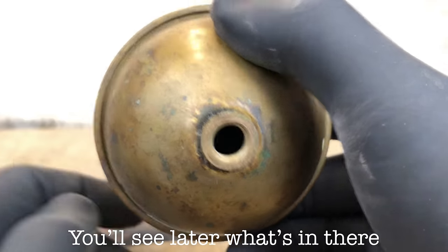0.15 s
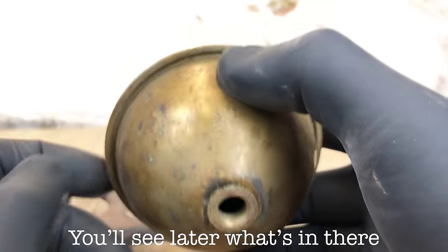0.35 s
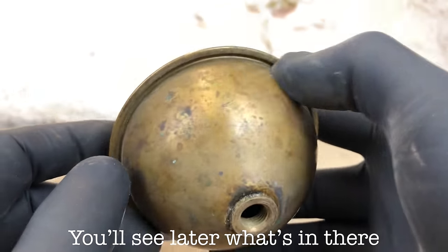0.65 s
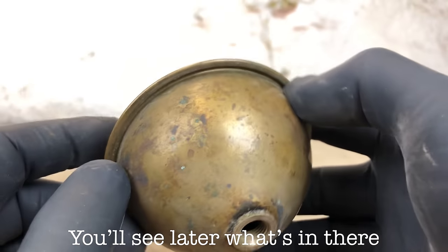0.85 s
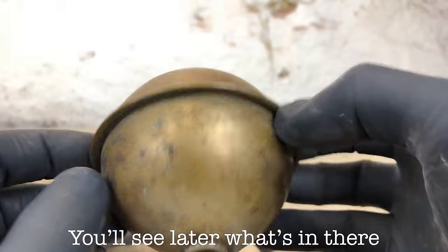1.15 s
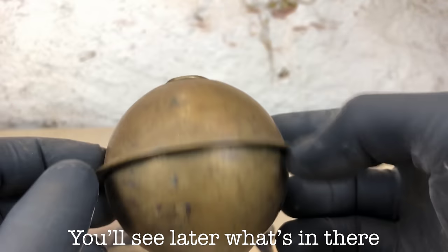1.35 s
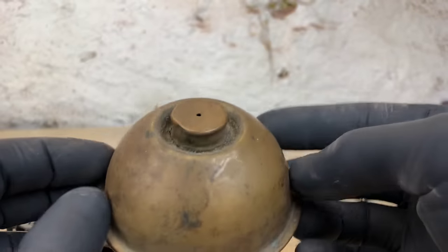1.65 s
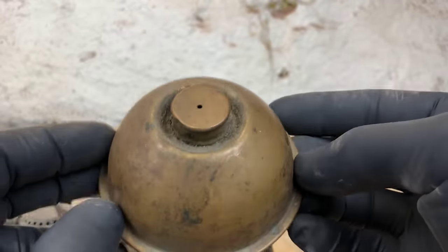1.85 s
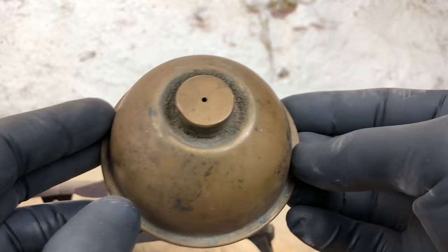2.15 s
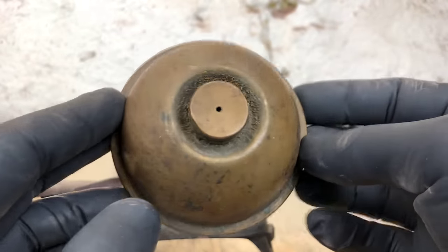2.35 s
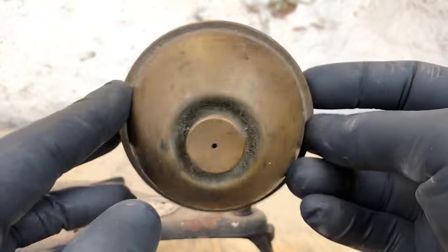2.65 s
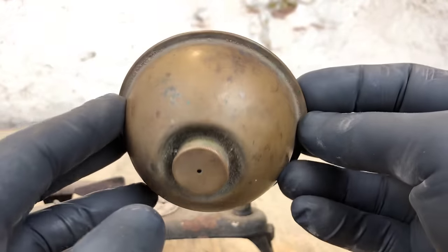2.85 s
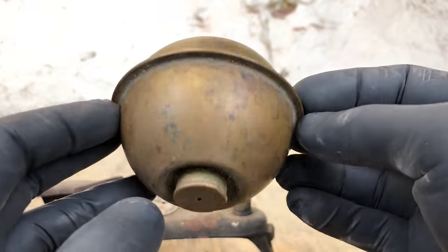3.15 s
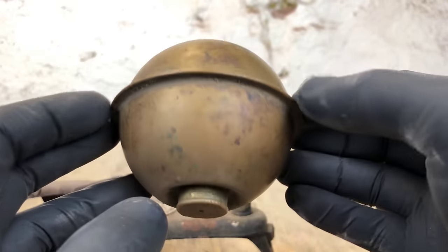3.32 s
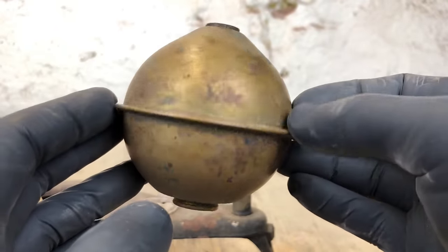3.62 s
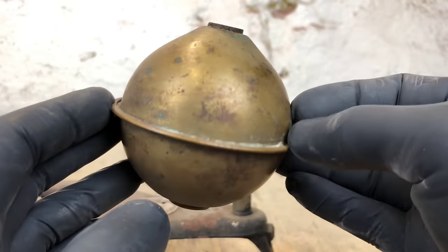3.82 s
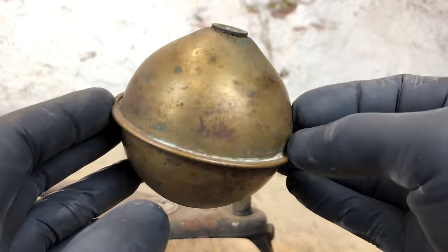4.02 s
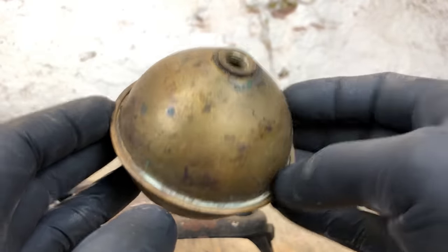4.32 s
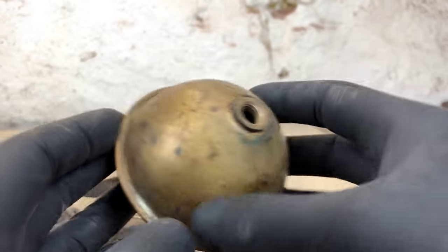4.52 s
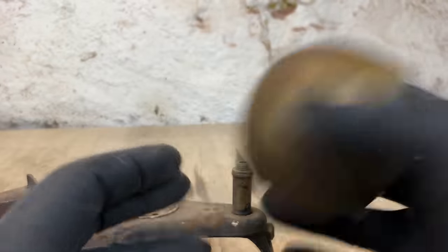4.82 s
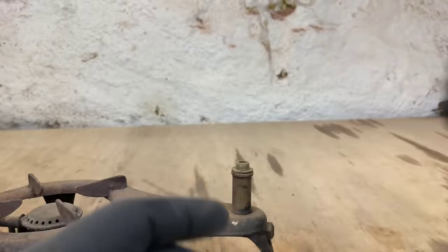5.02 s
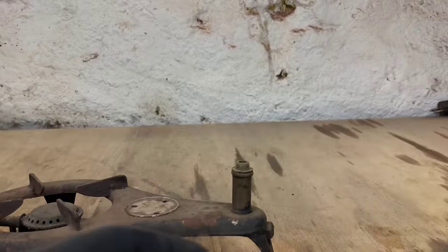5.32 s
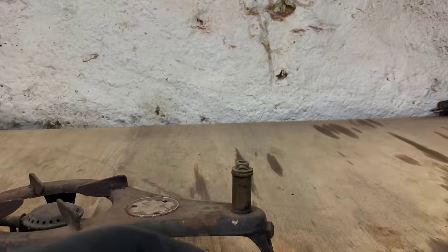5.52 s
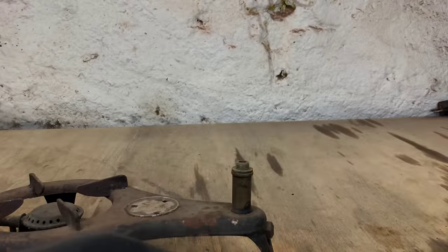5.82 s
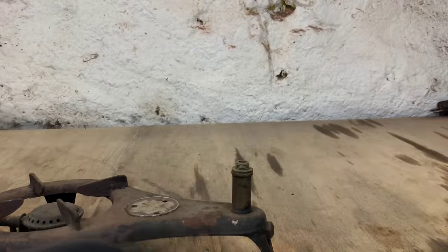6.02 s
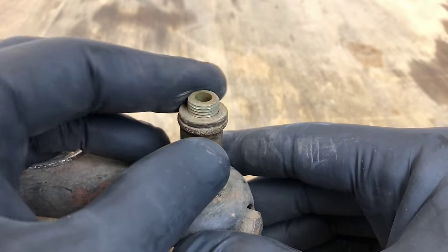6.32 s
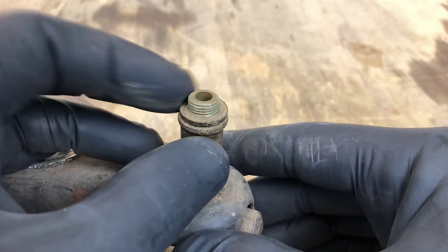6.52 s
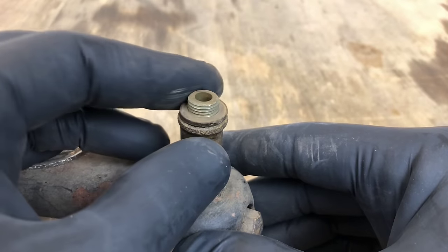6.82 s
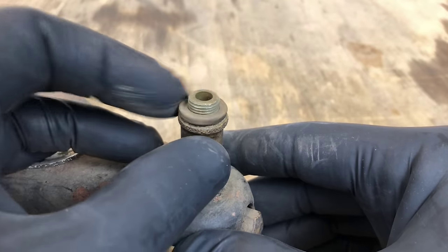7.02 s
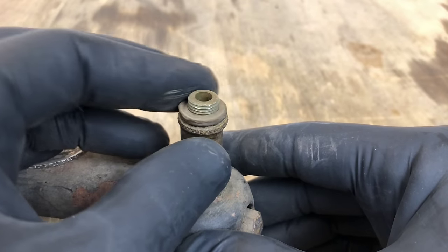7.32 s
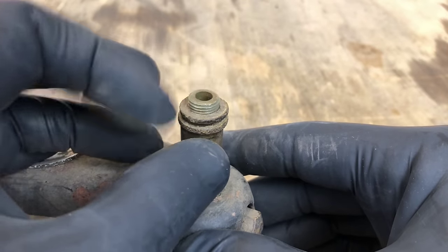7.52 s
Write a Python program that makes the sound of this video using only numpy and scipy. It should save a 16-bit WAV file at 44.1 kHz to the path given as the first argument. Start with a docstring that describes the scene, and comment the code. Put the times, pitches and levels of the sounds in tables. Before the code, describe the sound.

Close up in a small workshop, rubber gloves hiss faintly over a hollow brass ball, with tiny crisp ticks. A loose piece clatters brightly inside it, then a glove snaps off the metal and more ticks follow. An old iron stove lands with one loud, hard knock on a wooden bench. Finally a finger turns a threaded fitting in three short strokes, softly grinding and shrilly squeaking.

```python
"""Brass ball and stove fitting

Gloved hands turn a hollow brass ball: coloured noise makes the rubber hiss, decaying tones a rattle inside.
An old iron stove knocks once on the bench: a burst of noise, ringing tones and a low boom.
A finger then turns its threaded fitting in three strokes: noise through resonances makes each soft grinding,
and bending tones with overtones make the shrill squeaks. Close sound, small workshop with short echoes."""
import sys
import numpy as np
from scipy import signal
from scipy.fft import rfft, irfft, next_fast_len
from scipy.io import wavfile

SR = 44100
rng = np.random.default_rng(int(sys.argv[2]) if len(sys.argv) > 2 else 0)


def generate_wav(sig):
    """Save sig (samples, or channels by samples) to the path in sys.argv[1] as 16-bit PCM at SR."""
    pcm = np.round(np.clip(np.atleast_2d(sig).T, -1, 1) * 32767).astype(np.int16)
    wavfile.write(sys.argv[1], SR, pcm)


N = 338247
TIME = np.arange(N) / SR   # seconds

# Levels are relative: each sound may also have a trim of its own in its function.
# slides of the glove over the ball: [start t/s, length t/s, friction level/dB, fine hiss level/dB,
# swell from start to end level/dB]
GLOVE_SLIDES = [(0.052, 0.39, -69, -64.5, 5.5), (0.519, 0.064, -61.5, -55.5, 4),
                (0.62, 0.039, -60, -52.5, 4), (0.706, 0.55, -64.5, -57, 2.5), (1.315, 0.086, -69.5, -70, 8),
                (1.397, 0.13, -64.5, -58.5, 7), (1.597, .025, -58.5, -63, 0),
                (1.658, 0.39, -72.5, -65.5, -10.5), (2.03, .33, -79, -79, 7),
                (2.405, 0.057, -66.5, -66, -1), (2.506, .2, -68, -67.5, -1.5),
                (2.793, 0.43, -70.5, -69, 2.5), (3.24, 0.58, -68, -65.5, -3.5),
                (3.96, 0.034, -70.5, -72, -1), (4.118, 0.16, -67.5, -61, 1.5),
                (4.32, 0.362, -64.5, -55.5, 9), (4.729, 0.028, -59, -54, 3), (4.876, 0.17, -61.5, -62, 0),
                (5.072, 0.24, -76, -72, -5), (5.46, 0.079, -82, -76, 7)]
# colour of the rubbing: [f/Hz, level/dB per Hz]
FRICTION_COLOUR = [(700, -9.5), (1400, -10.5), (2200, -4), (3400, -3), (5500, 2), (8000, -0.5), (11000, -7),
                   (16000, -17.5)]
# colour of the finest hiss: [f/Hz, level/dB per Hz]
FINE_HISS_COLOUR = [(5000, -52), (9000, -13), (11500, -9.5), (13000, -8.5), (15000, 0), (16000, -4)]
# shell damped by the fingers: [f/Hz, width f/Hz, level/dB]
HELD_SHELL_RESONANCES = [(2810, 78, 0), (2845, 113, 4.5), (3960, 110, -5.5), (4155, 85, 1.5),
                         (4513, 85, 1.5), (5230, 120, -2), (5950, 150, -1.5), (6870, 73, -1.5),
                         (7720, 52, 0.5), (9200, 25, 1), (8860, 79, 0.5), (10000, 70, -0.5), (10600, 54, 3),
                         (12200, 110, 4), (13050, 120, 3.5)]
# soft bumps of the handling: [t/s, length t/s, level/dB, pitch f/Hz]
HANDLING_BUMPS = [(0.19, 0.21, -67, 220), (0.364, 0.22, -71, 403), (0.816, 0.28, -75.5, 398),
                  (1.025, 0.067, -65.5, 213), (1.622, 0.058, -59, 314), (1.683, 0.031, -67, 290),
                  (1.947, 0.083, -74, 404), (2.456, 0.057, -69, 290), (2.92, 0.15, -69.5, 230),
                  (3.326, 0.064, -68.5, 261), (3.692, 0.022, -72, 280), (4.298, 0.08, -69, 260),
                  (5.557, 0.063, -62.5, 212), (5.687, 0.029, -73.5, 180)]
# dull colour of the bumps: [f/Hz, level/dB per Hz]
BUMP_COLOUR = [(110, -16.5), (170, 1), (230, -3.5), (320, -1), (450, -5), (700, -16.5), (1500, -26.5)]
# small crisp ticks of bits inside the ball: [t/s, level/dB]
BALL_TICKS = [(1.1036, -42), (1.277, -38), (1.3099, -48), (1.5733, -45), (1.597, -43), (2.1306, -58),
              (2.2164, -57), (2.7821, -56), (4.848, -37), (4.9453, -45), (4.98, -44), (5.006, -42.5),
              (5.033, -40), (5.0726, -41), (5.119, -44), (5.1407, -44), (5.3687, -54)]
# colour of the ticks: [f/Hz, level/dB per Hz]
TICK_NOISE_COLOUR = [(1500, -21), (6000, -22), (10000, -19), (13000, -2), (15300, 11)]
# rubber letting go of metal: [t/s, level/dB]
RUBBER_SNAPS = [(0.661, -47), (0.862, -50), (2.47, -53), (4.2942, -26.5), (6.184, -58), (6.536, -45.5),
                (7.007, -46.5), (7.445, -47.5), (7.477, -49)]
# ring of the rubber's snap: [f/Hz, level/dB, time to fade by 60 dB t/s]
SNAP_RING = [(2400, 0, 0.0028), (4200, -7, .002), (7000, -2, 0.004), (8900, -3, .003), (13800, 0.5, .001)]
# noise of the snap, also of the stove's chink: [f/Hz, level/dB per Hz]
SNAP_NOISE_COLOUR = [(400, -23.5), (1200, -17), (2500, 2), (4000, -1.5), (7000, -4), (11000, -7.5),
                     (16000, -22)]
# loose piece striking inside the ball: [t/s, level/dB, extra for the low shell tones level/dB]
RATTLE_BLOWS = [(2.802, -18.5, -12), (2.826, -24, -20), (3.273, -8, -15.5), (3.295, -14, -26),
                (3.3012, -6, -5), (3.3051, 1.5, 4), (3.32, 3.5, -12), (3.3452, -7.5, -18),
                (3.377, -8.5, -23), (3.402, -16, -37), (3.428, -12, -39), (3.443, -21, -27)]
# ringing tones of the brass shell: [f/Hz, level/dB, time to fade by 60 dB t/s]
SHELL_RING = [(2820, -67, 0.067), (2900, -35, 0.1), (3000, -50, 0.061), (3062, -52, 0.13),
              (3891, -43, 0.11), (4340, -60, 0.045), (7580, -48.5, 0.049), (8600, -45, 0.035),
              (9140, -56, 0.042), (9469, -55, 0.088), (10450, -59, 0.062), (11500, -42, 0.053),
              (11900, -54, 0.059), (12660, -46, 0.065), (13220, -46, 0.081), (13400, -47, 0.1),
              (14190, -48, .07), (15300, -47, .05)]
# bright noise of a blow on the shell: [f/Hz, level/dB per Hz]
SHELL_CRACK_COLOUR = [(5500, -30), (7200, -9.5), (8000, -4), (10000, 14), (12000, 4), (16000, 11.5)]
# lower noise of a blow on the shell: [f/Hz, level/dB per Hz]
SHELL_CLACK_COLOUR = [(400, -34), (1500, -28), (2400, -19), (3000, 7), (3500, -3), (4000, 4), (5200, -32),
                      (9000, -29)]
# stove foot landing on the bench: [t/s, level/dB, metal chink level/dB]
STOVE_KNOCKS = [(5.7944, -0.5, -53.5), (5.8, -14.5, -40)]
# stove frame on the bench: [f/Hz, level/dB, time to fade by 60 dB t/s]
STOVE_RING = [(185, -42, 0.25), (256, -45, 0.25), (300.7, -35, 0.32), (365.6, -42, .18), (442, -40, 0.17),
              (520, -38, .12), (575, -32, 0.19), (627.5, -37, 0.19), (657, -32, 0.14), (732, -30, 0.14),
              (803, -33.5, 0.079), (851, -27, 0.15), (906, -31, 0.12), (1223, -32, 0.083),
              (1440, -42, 0.12), (2760, -41.5, 0.089), (3070, -44.5, 0.076), (3050, -47.5, .08),
              (3390, -42.5, 0.087)]
# further tones of the knock, most of them very short: [f/Hz, level/dB, time to fade by 60 dB t/s]
KNOCK_RING = [(604, -14.5, 0.021), (843, -25, 0.12), (1125, -23.5, 0.0067), (3240, -19.5, 0.0134),
              (4730, -30.5, 0.017)]
# noise of the landing: [f/Hz, level/dB per Hz]
THUD_COLOUR = [(110, -6.5), (240, 3.5), (470, -6), (690, 5.5), (930, -5), (1400, -10), (1900, -19),
               (2450, -25), (2750, -14), (3250, -8), (4000, -30.5), (4650, -22.5), (5500, -21.5),
               (6200, -35), (12000, -46)]
# pushes of the finger on the fitting: [start t/s, length t/s, thread grinding level/dB, glove drag level/dB]
FITTING_PUSHES = [(6.27, .05, -63.5, -69), (6.371, 0.049, -62.5, -62.5), (6.483, 0.065, -67, -69),
                  (6.767, 0.044, -67.5, -65), (6.877, 0.051, -65, -63), (7.012, 0.027, -65.5, -64.5),
                  (7.246, .05, -68.5, -63.5), (7.346, 0.047, -64.5, -64), (7.45, 0.022, -59, -60)]
# stove body under the grinding thread: [f/Hz, width f/Hz, level/dB]
GRIND_RESONANCES = [(159, 13, 1.5), (312, 124, -7.5), (612, 27, -2.5), (689.4, 27, 1), (882, 49, -4.5),
                    (1004, 36, -10.5), (1253, 140, -16.5), (1648, 50, -11.5), (2120, 450, -25),
                    (4900, 260, -23), (6400, 200, -19.5), (10100, 95, -28)]
# smooth hiss of the glove on the fitting: [f/Hz, level/dB per Hz]
GLOVE_DRAG_COLOUR = [(1500, -25), (3000, -7), (5000, -5.5), (8500, -8), (11000, -2.5), (13500, 4),
                     (16000, -4.5)]
# the hand leans on the stove: [t/s, length t/s, level/dB]
HAND_LEANS = [(6.735, 0.093, -59), (7.28, 0.079, -59.5), (7.46, 0.0694, -51.5)]
# low rumble, steady and in the leans: [f/Hz, level/dB per Hz]
RUMBLE_COLOUR = [(35, -34), (58, -10.5), (71, 5.5), (90, -10), (130, -15), (250, -21.5), (500, -46)]
# finger sliding back for a new stroke: [t/s, length t/s, level/dB]
FINGER_RETURNS = [(6.125, 0.091, -59.5), (6.693, 0.05, -65.5), (7.19, 0.098, -73)]
# swish of that slide: [f/Hz, level/dB per Hz]
SWISH_COLOUR = [(1000, -11), (3000, -8.5), (4500, 2), (5500, 1), (7000, -13), (9000, -15.5), (16000, -18)]
# stick-slip squeals of the thread: [start t/s, length t/s, starting f/Hz, middle f/Hz, final f/Hz,
# level/dB, loudest at this share of the length]
THREAD_SQUEAKS = [(6.481, 0.019, 5275, 4760, 4320, -35.5, 0.75),
                  (6.496, 0.028, 4280, 4470, 5340, -33.5, 0.94),
                  (6.900, 0.02, 15600, 15400, 15100, -31, .7),
                  (6.913, 0.017, 14800, 14700, 15100, -18, 0.58),
                  (7.019, .022, 5100, 3850, 3440, -28.5, 0.23),
                  (7.034, 0.018, 3550, 3470, 3430, -31.5, .25),
                  (7.36, 0.014, 7270, 7000, 6500, -40.5, 0.87), (7.373, .01, 6440, 6120, 6330, -17, 0.45),
                  (7.385, .023, 6230, 6760, 6170, -25.5, 0.32),
                  (7.408, 0.012, 5440, 6060, 5840, -16.5, 0.25),
                  (7.422, .027, 5320, 4574, 5370, -21.5, .27), (7.452, .015, 4600, 5054, 5000, -27, 0.28)]
# how strongly the fitting radiates each part of a squeak: [f/Hz, level/dB]
FITTING_RESPONSE = [(2200, -43), (3300, 0), (4100, 7.5), (4700, -4), (6200, -10.5), (7300, -6.5),
                    (8300, -3.5), (9200, -4), (10000, 2), (11000, -7.5), (12100, -0.5), (14000, -2),
                    (14900, 0), (15700, 0.5), (17500, -29)]
# echo of the room: [f/Hz, time to fade by 60 dB t/s]
ROOM_FADE = [(150, 0.62), (800, 0.34), (4000, 0.29), (9500, 0.16), (13000, 0.061)]
# quiet air of the room: [f/Hz, level/dB per Hz]
AIR_COLOUR = [(15, -38), (25, -23), (55, -1.5), (80, 7), (134, -5), (293, -2), (1190, -17.5), (2550, -18),
              (2840, -17.5), (3250, -23), (4250, -19), (4740, -25), (11000, -24.5), (14800, -24.5),
              (16000, -16)]

SLIDE_ATTACK_S, SLIDE_RELEASE_S = 0.049, 0.03
# fingers merely holding the ball
HOLD_UNTIL_S, HOLD_FRICTION_DB, HOLD_HISS_DB, HOLD_BUMPS_DB = 5.4, -80, -76.5, -79
SINGING_DB = 0   # the shell singing along, compared with the dry hiss
BUMP_SPREAD = 1.25   # band edges as a ratio to the pitch
# the bench swings up under the stove and settles; rise is the time to its greatest swing
BOOM_HZ, BOOM_DB, BOOM_RISE_S = 158, -38, .05
KNOCK_LOWEST_HZ = 70   # the knock is kept above this pitch
PUSH_ATTACK_S, PUSH_RELEASE_S, PUSH_SWELL_DB = .035, .05, 1.5
RUMBLE_FROM_S, RUMBLE_DB = 6.06, -64   # a steady low rumble from here to the end
SQUEAK_ARCH = .8   # higher: a more pointed swell
SQUEAK_LOWEST_HZ = 2900   # squeaks are kept above this pitch
# random waver of a squeak's pitch, and its rasp compared with the tone
SQUEAK_JITTER_HZ, SQUEAK_RASP_DB = 75, -21
CUTOFF_HZ = 15800


def glove_on_ball():
    """Rubber drags over brass: grainy hiss, the damped shell singing along, and dull bumps of the fingers."""
    held = stroke(0, HOLD_UNTIL_S, 0, SLIDE_ATTACK_S, SLIDE_RELEASE_S)
    friction = from_db(HOLD_FRICTION_DB) * held
    fine = from_db(HOLD_HISS_DB) * held
    for start, length, friction_db, fine_db, swell_db in GLOVE_SLIDES:
        speed = stroke(start, length, swell_db, SLIDE_ATTACK_S, SLIDE_RELEASE_S)
        # overlapping movements add as power
        friction = np.hypot(friction, from_db(friction_db) * speed)
        fine = np.hypot(fine, from_db(fine_db) * speed)
    singing = from_db(SINGING_DB)
    shell = singing * rubbed(HELD_SHELL_RESONANCES, shift_db=4.0)
    rub = (noise(FRICTION_COLOUR) + shell) / np.sqrt(1 + singing ** 2)
    hiss = from_db(1.5) * (friction * rub + fine * noise(FINE_HISS_COLOUR))
    hiss = hiss * grainy(depth_db=1.6, rate=40) * grainy(depth_db=1.13, rate=900)
    holding = from_db(HOLD_BUMPS_DB) * held * noise(BUMP_COLOUR)
    return hiss + holding + bumps()


def bumps():
    """The fingers shift their grip: dull swells, each around a pitch of its own."""
    dull = noise(BUMP_COLOUR)
    out = 0
    for s, length, db, hz in HANDLING_BUMPS:
        edges = [hz / BUMP_SPREAD, hz * BUMP_SPREAD]
        band = filtered(dull, 1, edges, "band")
        out = out + swells([(s, length, db)]) * rms_one(band)
    return out


def rubber_snaps():
    """Rubber peels off metal with a short ring, a burst of noise under it."""
    snaps = clicks(*np.transpose(RUBBER_SNAPS))
    crack = sum(from_db(db) * struck(snaps, hz, t60) for hz, db, t60 in SNAP_RING)
    peel = burst(snaps, SNAP_NOISE_COLOUR, t60=.05)
    return crack + from_db(-19) * peel


def ball_ticks():
    """Small bits inside the ball tick crisply: each is a quickly fading burst of bright noise."""
    return from_db(-2) * burst(clicks(*np.transpose(BALL_TICKS)), TICK_NOISE_COLOUR, t60=.025)


def rattle():
    """The loose piece lands on a new spot each time, so each blow excites the shell's tones differently."""
    s, db, low_db = np.transpose(RATTLE_BLOWS)
    out = from_db(-34.5) * burst(clicks(s, db), SHELL_CRACK_COLOUR, t60=0.029)
    out += from_db(-44) * burst(clicks(s, db + low_db), SHELL_CLACK_COLOUR, t60=0.046)
    for hz, mode_db, t60 in SHELL_RING:
        is_low = hz < 6000
        spot_db = (1 if is_low else 3.5) * rng.standard_normal(len(s))
        level_db = db + mode_db + is_low * low_db + spot_db
        out += struck(clicks(s, level_db), hz, t60)
    return out


def knock():
    """The stove drops onto wood: a hard noisy clap, ringing tones, a small chink and the bench's boom."""
    s, db, chink_db = np.transpose(STOVE_KNOCKS)
    landing = clicks(s[:1], db[:1])   # only the first contact sets the tones ringing
    body = 0
    for k, (hz, mode_db, t60) in enumerate(STOVE_RING + KNOCK_RING):
        body = body + (-1) ** k * from_db(mode_db) * struck(landing, hz, t60)
    thud = from_db(-22) * burst(clicks(s, db), THUD_COLOUR, t60=0.086)
    chink = burst(clicks(s, chink_db), SNAP_NOISE_COLOUR, t60=0.038)
    age = np.maximum(TIME - s[0], 0)
    rise = age / BOOM_RISE_S
    swing = rise * np.exp((1 - rise ** 2) / 2)   # 1 at its peak
    boom = from_db(BOOM_DB) * swing * np.sin(2 * np.pi * BOOM_HZ * age)
    return filtered(body + thud + boom + chink, 3, KNOCK_LOWEST_HZ, "high")


def thread():
    """Pushes grind the thread under a glove's hiss; a low rumble swells at each lean, the finger slides back."""
    grind, drag = 0, 0
    for start, length, grind_db, drag_db in FITTING_PUSHES:
        effort = stroke(start, length, PUSH_SWELL_DB, PUSH_ATTACK_S, PUSH_RELEASE_S)
        grind = grind + from_db(grind_db) * effort
        drag = drag + from_db(drag_db) * effort
    grinding = from_db(2.5) * grind * rubbed(GRIND_RESONANCES, shift_db=2.0) * grainy(depth_db=2.0, rate=300)
    hiss = drag * noise(GLOVE_DRAG_COLOUR) * grainy(depth_db=2.0, rate=1400)
    steady = from_db(RUMBLE_DB) * stroke(RUMBLE_FROM_S, N / SR, 0, PUSH_ATTACK_S, PUSH_RELEASE_S)
    rumble = np.hypot(steady, swells(HAND_LEANS)) * noise(RUMBLE_COLOUR)
    swish = swells(FINGER_RETURNS) * noise(SWISH_COLOUR)
    return grinding + hiss + rumble + swish


def squeaks(flutter=0.63):
    """Stick-slip with a bending pitch; each partial swells as it crosses a resonance of the fitting."""
    out = np.zeros(N)
    waver = SQUEAK_JITTER_HZ * drift(1300)
    grip = 1 + flutter * np.tanh(drift(800))
    rasp = 1 + from_db(SQUEAK_RASP_DB) * drift(3500)
    for start, length, first_hz, middle_hz, last_hz, db, loudest in THREAD_SQUEAKS:
        on = (TIME > start) & (TIME < start + length)
        share = (TIME[on] - start) / length
        # the pitch bends to its middle value and away again
        outer_hz = np.where(share < .5, first_hz, last_hz)
        hz = middle_hz + (outer_hz - middle_hz) * (2 * share - 1) ** 2 + waver[on]
        phase = 2 * np.pi * np.cumsum(hz) / SR
        tone = 0
        for k in range(1, 5):
            audible = k * hz < SR / 2   # leave out what this sample rate cannot hold
            tone = tone + from_db(at_hz(FITTING_RESPONSE, k * hz)) * audible * np.sin(k * phase)
        peak = np.clip(loudest, .05, .95)
        arch = np.sin(np.interp(share, [0, peak, 1], [0, np.pi / 2, np.pi])) ** SQUEAK_ARCH
        out[on] += from_db(db) * arch * grip[on] * rasp[on] * tone
    return filtered(out, 4, SQUEAK_LOWEST_HZ, "high")


def workshop(x, near_db=-12, near_t60=0.11, tail_db=-17):
    """Treble scatters off things nearby, then a short tail whose top dies first."""
    t = TIME[:SR // 2]
    edges = np.geomspace(60, 18000, 10)
    tail = 0
    for low, high in zip(edges, edges[1:]):
        band = filtered(rng.standard_normal(len(t)), 2, [low, high], "band")
        tail = tail + band * np.exp(-np.log(1000) * t / at_hz(ROOM_FADE, np.sqrt(low * high)))
    tail = tail * (t > .006)
    near = filtered(rng.standard_normal(len(t)), 2, 1200, "high")
    near = near * np.exp(-np.log(1000) * t / near_t60) * (t > .0015)
    echo = from_db(near_db) * near / np.linalg.norm(near) + from_db(tail_db) * tail / np.linalg.norm(tail)
    return signal.fftconvolve(x, echo)[:N]


def quiet_air():
    """The room's steady, faint background is coloured noise."""
    return from_db(-68) * noise(AIR_COLOUR)


def rubbed(resonances, shift_db):
    """Friction noise through parallel resonances, each swelling as the contact point moves; rms 1."""
    drive, out = rng.standard_normal(N), 0
    for k, (hz, width, db) in enumerate(resonances):
        r = np.exp(-np.pi * width / SR)   # a wider resonance dies faster
        top = (1 - r * r) / 2 * from_db(db) * (-1) ** k
        feedback = [1, -2 * r * np.cos(2 * np.pi * hz / SR), r * r]
        out = out + signal.lfilter([top, 0, -top], feedback, drive * grainy(shift_db, rate=35))
    return rms_one(out)


def struck(hits, hz, t60):
    """A mode that takes a cycle or two to build up, so that it sounds only near its own pitch."""
    edges = np.clip([hz / np.sqrt(2), hz * np.sqrt(2)], 10, .48 * SR)
    return filtered(ring(hits, hz, t60), 1, edges, "band")


def ring(hits, hz, t60):
    """A unit click sets a cosine of height 1 ringing; it fades by 60 dB in t60 seconds."""
    r = from_db(-60 / (t60 * SR))
    w = 2 * np.pi * hz / SR
    return signal.lfilter([1, -r * np.cos(w)], [1, -2 * r * np.cos(w), r * r], hits + 1e-18)


def burst(hits, spectrum, t60):
    """Countless short modes: coloured noise that starts at each contact and dies away."""
    fade = signal.lfilter([1], [1, -from_db(-60 / (t60 * SR))], hits + 1e-18)
    return fade * noise(spectrum)


def clicks(times, level_db):
    """One impulse for each contact."""
    out = np.zeros(N)
    out[np.round(np.asarray(times) * SR).astype(int)] = from_db(level_db)
    return out


def stroke(start, length, swell_db, attack_s, release_s):
    """Gain of one movement: it sets in, swells steadily while it lasts, and lets go."""
    end = start + length
    moments = [start - attack_s, start, end, end + release_s]
    return np.interp(TIME, moments, [0, from_db(-swell_db / 2), from_db(swell_db / 2), 0])


def swells(rows):
    """Gain of brief rounded swells, each about its own moment."""
    offset = np.linspace(-1, 1, 41)
    shape = np.exp(-(2 * offset) ** 4)
    return sum(np.interp(TIME, s + length * offset, from_db(db) * shape) for s, length, db in rows)


def noise(spectrum):
    """Noise of a given colour, falling away below its lowest point; rms 1."""
    size = next_fast_len(N)
    hz = np.arange(size // 2 + 1) * SR / size
    shape = from_db(at_hz(spectrum, hz)) * np.minimum(hz / spectrum[0][0], 1) ** 2
    return rms_one(irfft(rfft(rng.standard_normal(size)) * shape, size)[:N])


def grainy(depth_db, rate):
    """Uneven grip: a random gain of unit power."""
    return rms_one(from_db(depth_db * drift(rate)))


def drift(rate):
    """Random wander with about `rate` turns a second; rms 1."""
    steps = rng.standard_normal(N // 8)
    return rms_one(np.interp(TIME * rate, np.arange(len(steps)), steps))


def filtered(x, order, edges, kind):
    """Keep a band of pitches, or only those above an edge in Hz."""
    return signal.sosfilt(signal.butter(order, edges, kind, fs=SR, output="sos"), x)


def at_hz(points, hz):
    """Read a table on a log-frequency axis."""
    f, value = np.transpose(points)
    return np.interp(np.log(np.maximum(hz, 1)), np.log(f), value)


def rms_one(x):
    """Scale to unit rms, a measure of average strength."""
    return x / np.sqrt(np.mean(x ** 2) + 1e-20)


def from_db(db):
    """Decibels to gain."""
    return np.exp(np.asarray(db) * (np.log(10) / 20))


def scene():
    """All handling sounds in the room, over its quiet air."""
    ball = glove_on_ball() + rubber_snaps() + ball_ticks() + rattle()
    close = ball + knock() + thread() + squeaks()
    return (close + workshop(close) + quiet_air())[None]


def record(dry):
    """The top is cut steeply."""
    return signal.sosfilt(signal.ellip(12, .1, 80, CUTOFF_HZ, fs=SR, output="sos"), dry)


dry = scene()
out = record(dry)
generate_wav(out)
```